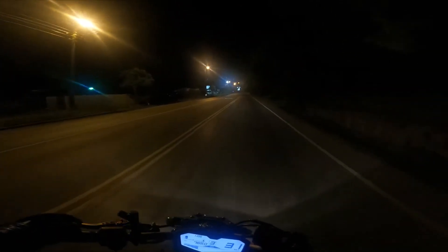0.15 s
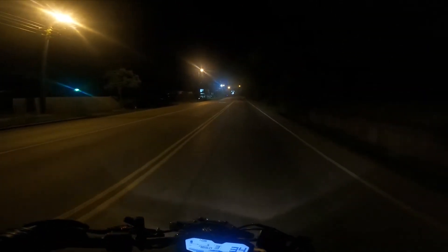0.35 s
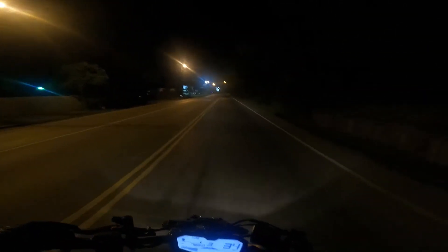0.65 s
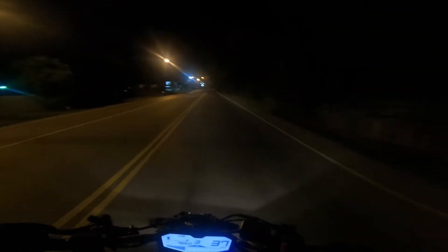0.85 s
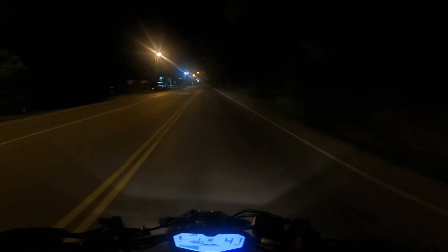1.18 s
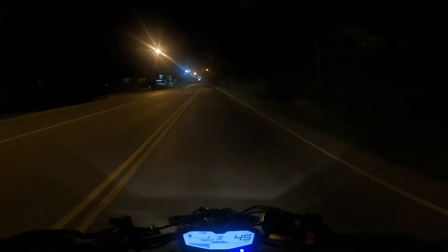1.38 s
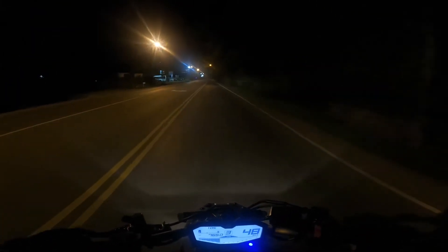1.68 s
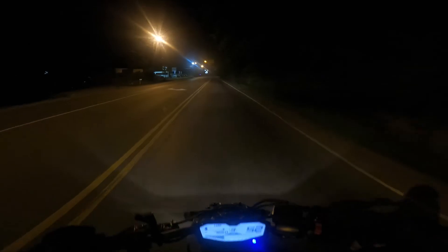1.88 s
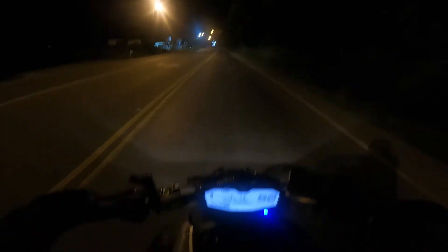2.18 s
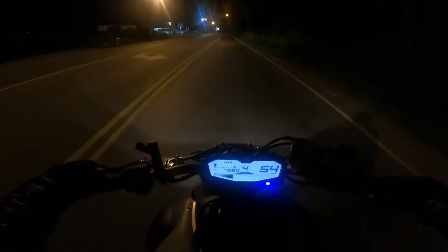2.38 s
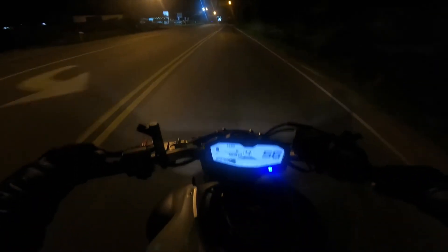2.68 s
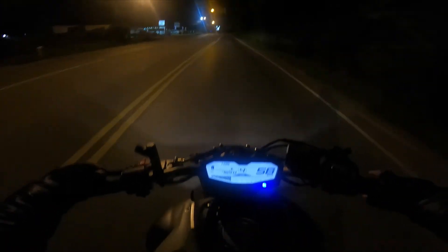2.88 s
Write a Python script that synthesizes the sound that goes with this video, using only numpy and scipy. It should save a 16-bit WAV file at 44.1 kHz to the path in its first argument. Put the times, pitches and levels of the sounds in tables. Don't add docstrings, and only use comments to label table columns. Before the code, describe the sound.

Motorcycle engine heard from the rider's position outdoors: throaty, uneven firing climbs in pitch, briefly softens at a gear change, catches with a blip, then climbs slowly amid low wind buffeting and a small early tick.

```python
import sys
import numpy as np
from scipy import signal
from scipy.io import wavfile

SR = 44100
rng = np.random.default_rng(int(sys.argv[2]) if len(sys.argv) > 2 else 0)


def magnitude_from_level(level_db):
    exponent = np.asarray(level_db, float) / 20
    return 10 ** exponent


def output_pcm(signal):
    pcm = np.clip(np.atleast_2d(signal).T, -1, 1) * 32767
    wavfile.write(sys.argv[1], SR, np.round(pcm).astype(np.int16))


N = 134505

# (time [s], four-stroke cycle rate [Hz])
CYCLE_RATE = [(0, 21.21), (.3, 22.93), (.6, 25.09), (.9, 27.4), (1.2, 29.49), (1.5, 31.3), (1.87, 33.99),
              (1.92, 31.95), (2.0, 28.16), (2.09, 23.09), (2.13, 27.39), (2.18, 31.93), (2.22, 26.2),
              (2.27, 27.27), (2.4, 27.48), (2.7, 28.39), (3.05, 29.34)]
# (time [s], exhaust boom level [dB], pipe bark level [dB])
THROTTLE = [(0, -10, -20.5), (.7, -13, -21), (.9, -11, -23), (1.45, -13.5, -25), (1.87, -14.5, -30.5),
            (1.91, -25.5, -49), (2.0, -21.5, -68), (2.09, -25, -48), (2.115, -15, -25), (2.19, -11, -25.5),
            (2.23, -13.5, -26), (2.4, -14.5, -26), (3.05, -14, -27)]
MID_HZ = 28


def in_time(rows):
    s, *columns = np.transpose(rows)
    return [np.interp(np.arange(N) / SR, s, c) for c in columns]


def rms_one(x):
    return x / np.sqrt(np.mean(x ** 2) + 1e-20)


def drift(rate_hz):
    r = np.exp(-2 * np.pi * rate_hz * 40 / SR)
    slow = signal.lfilter([1], [1, -2 * r, r * r], rng.standard_normal(N // 40 + 2002))[2000:]
    return np.interp(np.arange(N) / 40, np.arange(len(slow)), rms_one(slow))


def butter(x, hz, kind):
    return signal.sosfilt(signal.butter(2, hz, kind, fs=SR, output="sos"), x)


def resonate(x, hz, width_hz):
    r = np.exp(-np.pi * width_hz / SR)
    poles = [1, -2 * r * np.cos(2 * np.pi * hz / SR), r * r]
    return signal.lfilter([(1 - r * r) / 2, 0, (r * r - 1) / 2], poles, x + 1e-18)


def banded_noise(spectrum, patchy_db):
    at_hz, db = np.transpose(spectrum)
    edges_hz = 190 * 2 ** np.arange(0, 6.6, .5)
    white = rng.standard_normal((2, N))
    together = drift(3)
    out = 0
    for k, (low, high) in enumerate(zip(edges_hz, edges_hz[1:])):
        band = butter(white[k % 2], [low, high], "band")
        level_db = np.interp(np.log(low * high) / 2, np.log(at_hz), db)
        out = out + band * magnitude_from_level(level_db + patchy_db * (0.5 * together + drift(5)))
    return rms_one(out)


def wind():
    # (time [s], level [dB])
    gusts = [(0, -31), (.5, -24), (1.0, -27), (1.55, -25), (1.75, -26), (1.9, -26), (2.05, -26),
             (2.2, -25.5), (2.29, -17), (2.42, -29), (2.75, -22), (3.05, -23)]
    # (frequency [Hz], density [dB per Hz])
    rush_spectrum = [(200, -3), (400, -7), (900, -10), (1500, -18), (3000, -27), (5000, -36), (9000, -47),
                     (15500, -58)]
    rush_db, rush_growth_db_per_s = -38, 1.2
    buffet_db, lump_db = .3, 1.5
    gust_db, = in_time(gusts)
    low = butter(rng.standard_normal(N + SR), [28, 80], "band")[SR:]
    buffet = magnitude_from_level(gust_db + buffet_db + lump_db * drift(9)) * rms_one(low)
    rush_gain = magnitude_from_level(rush_db + rush_growth_db_per_s * np.arange(N) / SR)
    return buffet + rush_gain * banded_noise(rush_spectrum, patchy_db=2.0)


def ticks():
    # (time [s], peak level [dB])
    tick_events = [
        (0.2076, -18.5),
        (0.3814, -38),
    ]
    # (frequency [Hz], level [dB], t60 [s])
    modes = [(1430, -11, 0.018), (1800, -13.0, 0.021), (2580, -19.5, 0.011), (3100, -18, 0.012),
             (4330, -25, 0.012), (4700, -20, .015), (6160, -31, .006), (7400, -34, 0.005),
             (9400, -33, .005)]
    contacts, first_contact_db, loss_db, spread_db = 14, 5, 0.63, 3.5
    out = np.zeros(N)
    for hz, mode_db, t60_s in modes:
        clicks = np.zeros(N)
        for start_s, peak_db in tick_events:
            for k in range(contacts):
                s = start_s + .001 + .0009 * k ** 1.6 * rng.uniform(.8, 1.2)
                db = peak_db + mode_db - loss_db * k + first_contact_db * (k == 0)
                clicks[int(s * SR)] += magnitude_from_level(db + rng.normal(0, spread_db)) * rng.choice([-1, 1])
        r, w = magnitude_from_level(-60 / (t60_s * SR)), 2 * np.pi * hz / SR
        out += signal.lfilter([0, np.sin(w)], [1, -2 * r * np.cos(w), r * r], clicks + 1e-18)
    return out


def overrun():
    # (multiple of cycle rate [1], level [dB])
    orders = [
        (3, -26.5),
        (5, -29),
        (11, -41.5),
    ]
    shut_below_db, shut_span_db = -32, 10
    rate_hz, = in_time(CYCLE_RATE)
    _, bark_db = in_time(THROTTLE)
    shut = np.clip((shut_below_db - bark_db) / shut_span_db, 0, 1)
    cycle = np.cumsum(rate_hz) / SR
    return shut * sum(magnitude_from_level(db) * np.sqrt(2) * np.sin(2 * np.pi * np.round(k) * cycle) for k, db in orders)


def firings():
    start_cycle, second_fires_cycle, advance_cycle_per_hz, jitter_s = .905, .372, .005, .00005
    rate_hz, = in_time(CYCLE_RATE)
    rate = np.r_[np.full(SR, rate_hz[0]), rate_hz]
    cycle = start_cycle + (np.cumsum(rate) - SR * rate_hz[0]) / SR
    cycle = cycle + advance_cycle_per_hz * (rate - MID_HZ)
    turns = np.arange(-12, 100)
    due = np.r_[turns, turns + second_fires_cycle]
    second = np.repeat([0, 1], len(turns))
    chance = rng.standard_normal((len(due), 12))
    at = np.interp(due, cycle, np.arange(len(cycle))) + jitter_s * SR * chance[:, 0]
    keep = due < cycle[-1] - .02
    return at[keep], second[keep], np.interp(due, cycle, rate)[keep], chance[keep]


def train(at, size):
    out, whole = np.zeros(N + 2 * SR), at.astype(int)
    np.add.at(out, whole, size * (1 - at + whole))
    np.add.at(out, whole + 1, size * (at - whole))
    return out[:N + SR]


def bump(clicks, rise_ms):
    r = np.exp(-1000 / (rise_ms * SR))
    return signal.lfilter([np.e ** 2 / 2 * (1 - r) ** 2], np.poly([r, r, r]), clicks + 1e-18)[SR:]


def rings(at, size, hz, width_hz, rise_ms):
    n = at.astype(int)[:, None] + np.arange(1, 2600)
    t = (n - at[:, None]) / SR
    swell = 1 - np.exp(-1000 * t / rise_ms[:, None])
    wave = np.exp(-np.pi * width_hz * t) * swell * np.cos(2 * np.pi * hz[:, None] * t)
    return np.bincount(n.ravel(), (width_hz * size[:, None] * wave).ravel(), N + 2 * SR)[SR:N + SR]


def gas_hiss(at, size, effort_db):
    # (frequency [Hz], density [dB per Hz])
    hiss_spectrum = [(300, -9), (1300, -5), (2000, -18), (3100, -13), (4200, -31), (7000, -36),
                     (11500, -40), (15500, -47)]
    hiss_db, follows_effort, speed_db_per_hz = -37.3, .6, .25
    puff_ms, puff_share = 2.5, .5
    rate_hz, = in_time(CYCLE_RATE)
    puffs = 1 - puff_share + puff_share * rms_one(bump(train(at, size), puff_ms))
    level_db = hiss_db + follows_effort * effort_db + speed_db_per_hz * (rate_hz - MID_HZ)
    return magnitude_from_level(level_db) * puffs * banded_noise(hiss_spectrum, patchy_db=1.2)


def valve_gear(at, now_db, chance):
    hz, width_hz, level_db, uneven_db, lag_s = 4700, 350, -61.5, 4, .002
    click = train(at + lag_s * SR, magnitude_from_level(.6 * now_db + uneven_db * chance[:, 0]))
    return magnitude_from_level(level_db) * rms_one(resonate(resonate(click, hz, 4 * width_hz), hz, width_hz)[SR:])


def panel(at, second, chance):
    # (time [s], level [dB])
    buzz = [(0, -30), (.8, -20), (.87, 2), (1.12, 0), (1.3, -8), (1.45, -25), (2.12, -20), (2.2, -7),
            (2.45, -7), (2.6, -2), (2.78, -2), (2.88, -14), (3.05, -20)]
    hz, width_hz, level_db, lag_s = 1108, 24, -43, .003
    shake = second * magnitude_from_level(np.interp(at / SR - 1, *np.transpose(buzz)) + 1.5 * chance[:, 11])
    ring = resonate(resonate(train(at + lag_s * SR, shake), hz, 150), hz, width_hz)[SR:]
    return magnitude_from_level(level_db) * rms_one(ring)


def exhaust_bark(at, second, speed, now_db, chance):
    # (frequency [Hz], width [Hz], level [dB], polarity [+-1],
    # level gain [dB per Hz of cycle rate], pitch gain [share per Hz of cycle rate])
    pipe_modes = [(285.5, 22.3, 3.5, -1, -2.37, 0.01), (376, 32, -2, -1, 0.75, 0.0042),
                  (468, 54.3, 9.5, 1, 0.92, 0.0023), (661.6, 36.7, 5.5, 1, 1.14, 0.0012),
                  (861, 109, 4, -1, 1, 0.0072), (1170, 77, -9, -1, 2.3, 0.002),
                  (1383, 340, -16, 1, 2.5, .003), (2252, 40, -12.5, 1, 1.57, 0.0013),
                  (3205, 480, -14.5, -1, 0.21, .001)]
    second_db, uneven_db, early_s, cut_hz = 3.5, .9, .0005, 3000
    rise_at_mid_ms, rise_loss_per_hz, first_rise_factor = 0.47, 0.16, 0.93
    over_hz = speed - MID_HZ
    rise_ms = rise_at_mid_ms * np.exp(-rise_loss_per_hz * over_hz) * np.where(second, 1, first_rise_factor)
    bark = 0
    for k, (hz, width_hz, db, polarity, tilt_db, glide) in enumerate(pipe_modes):
        size_db = now_db + tilt_db * over_hz + second_db * second + uneven_db * chance[:, 2 + k]
        ring = rings(at - early_s * SR, magnitude_from_level(size_db), hz * (1 + glide * over_hz), width_hz, rise_ms)
        bark = bark + np.sign(polarity) * magnitude_from_level(db) * ring
    return rms_one(butter(bark, cut_hz, "low"))


def exhaust_boom(at, size, speed):
    # (lag [ms], strength [1], rise [ms])
    returns = [
        (.35, -.44, 1.2),
        (3.0, .55, .95),
        (7.75, -.41, .58),
        (10.1, .33, .83),
        (13.4, -.16, .8),
        (17.7, -.13, 2.1),
    ]
    hot_gas_per_hz = .005
    sooner = 1 - hot_gas_per_hz * (speed - MID_HZ)
    boom = sum(g * bump(train(at + lag_ms * sooner * SR / 1000, size), rise_ms)
               for lag_ms, g, rise_ms in returns)
    return rms_one(butter(boom, 18, "high"))


def engine():
    second_db, uneven_db, boom_gain_db, bark_gain_db = 1.1, .8, -4.5, -.6
    boom_db, bark_db = in_time(THROTTLE)
    at, second, speed, chance = firings()
    effort_db = bark_db - bark_db.mean()
    now_db = effort_db[np.clip(at.astype(int) - SR, 0, N - 1)]
    size = magnitude_from_level(second_db * second + uneven_db * chance[:, 1])
    boom = magnitude_from_level(boom_db + boom_gain_db) * exhaust_boom(at, size, speed)
    bark = magnitude_from_level(bark_db.mean() + bark_gain_db) * exhaust_bark(at, second, speed, now_db, chance)
    rattle = panel(at, second, chance) + valve_gear(at, now_db, chance)
    return boom + bark + rattle + gas_hiss(at, size, effort_db)


def scene():
    return (wind() + ticks() + overrun() + engine())[None]


def roll_off(x):
    return signal.sosfilt(signal.butter(12, 15720, fs=SR, output="sos"), x)


def record(dry):
    ceiling, drive_db = 0.85, 5.5
    mix = ceiling * np.tanh(magnitude_from_level(drive_db) * dry / ceiling)
    return roll_off(mix)


dry = scene()
out = record(dry)
output_pcm(out)
```